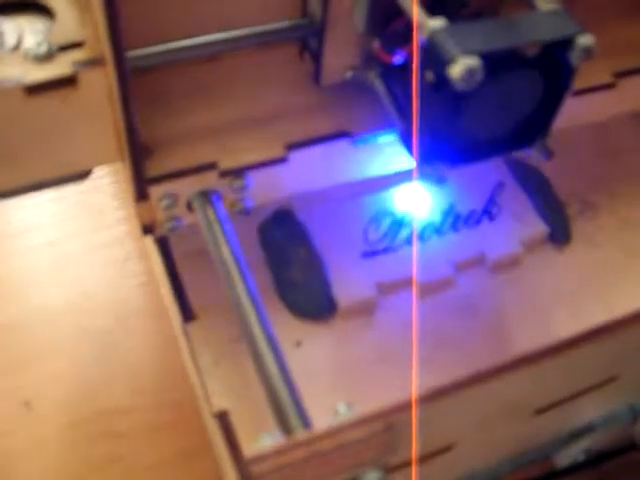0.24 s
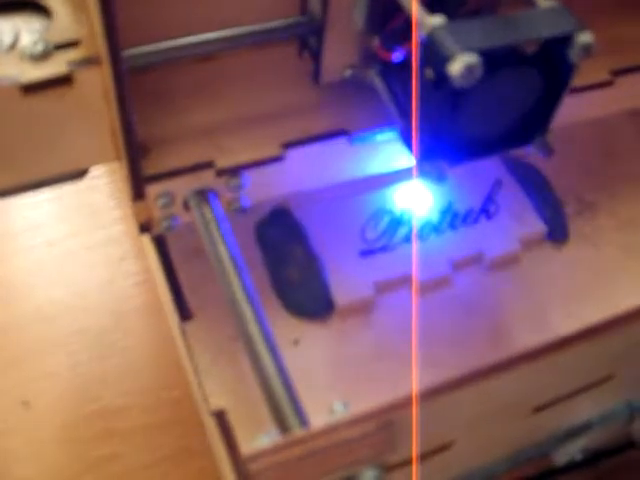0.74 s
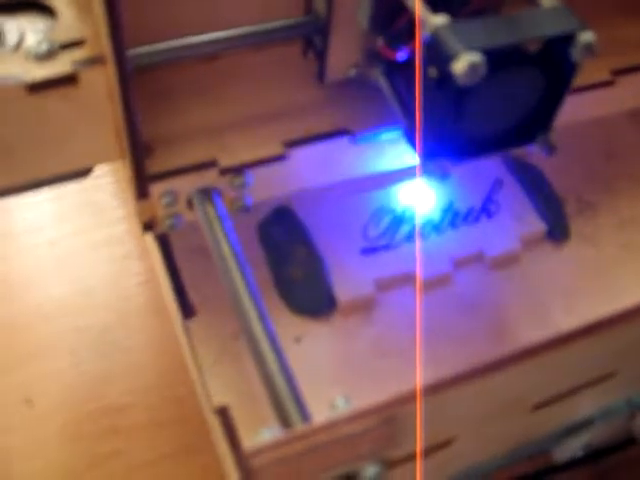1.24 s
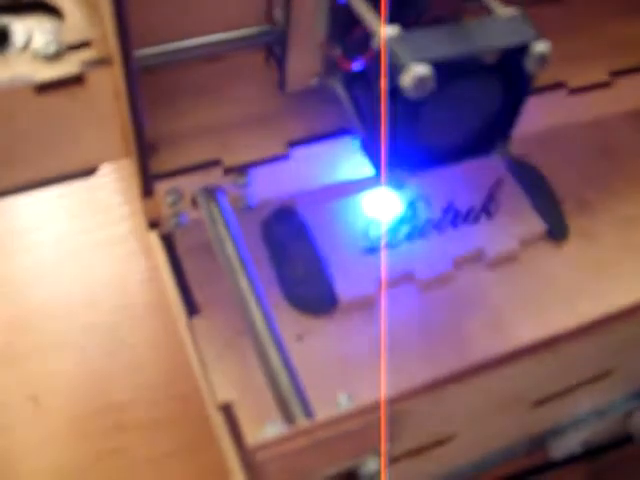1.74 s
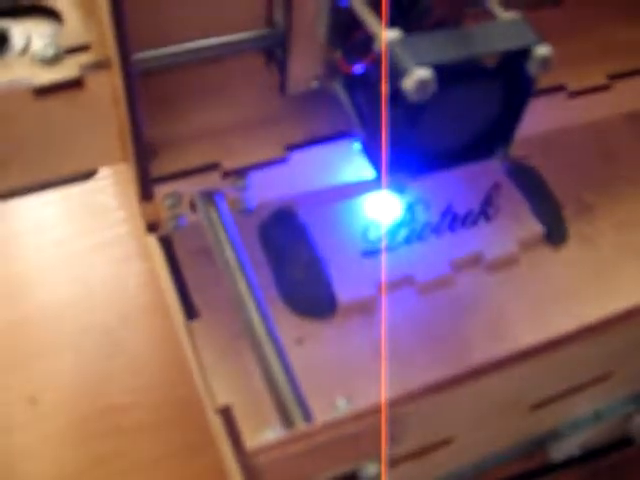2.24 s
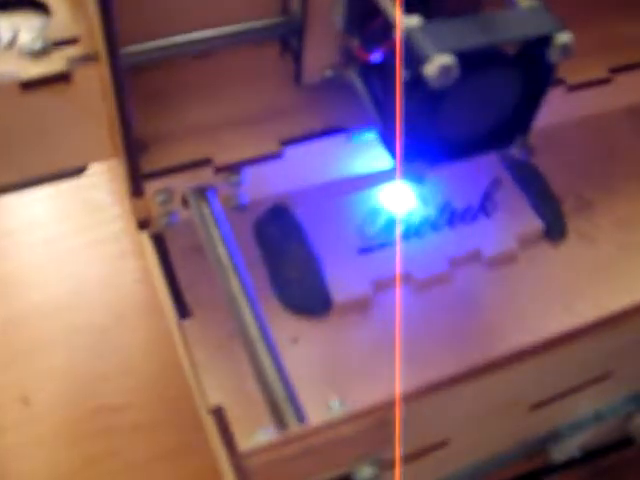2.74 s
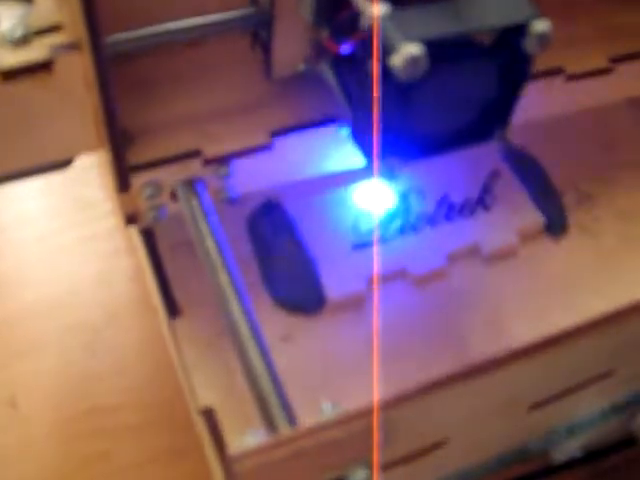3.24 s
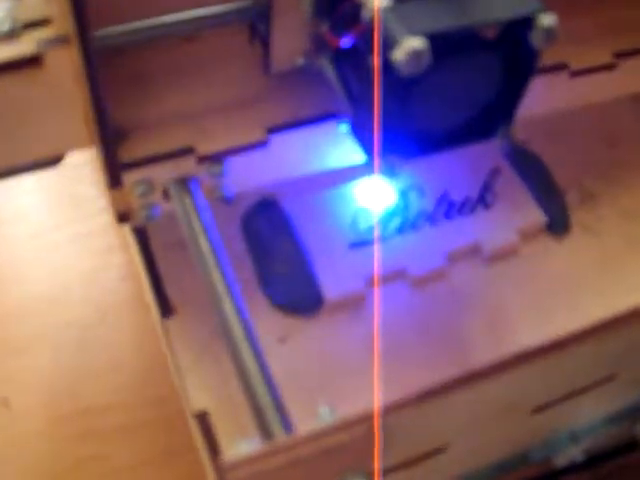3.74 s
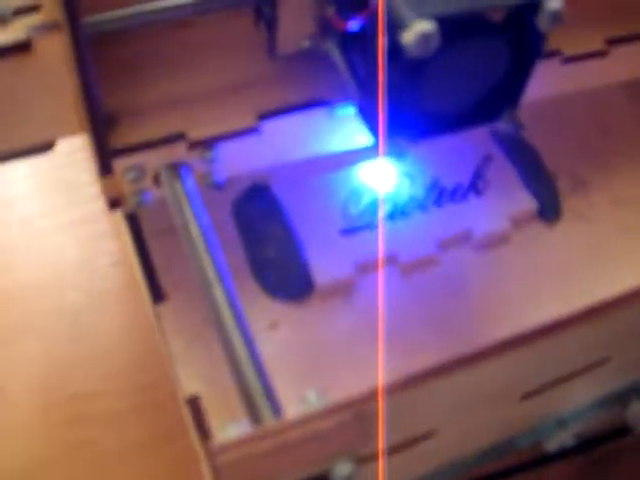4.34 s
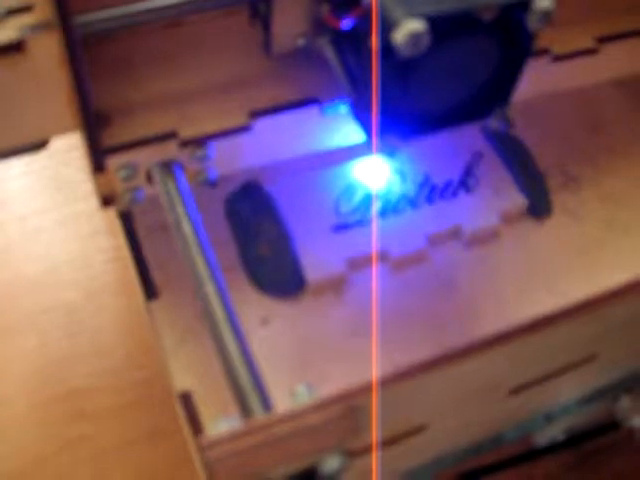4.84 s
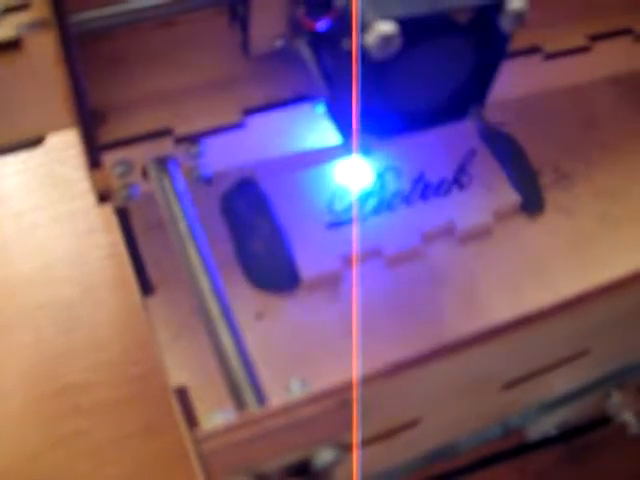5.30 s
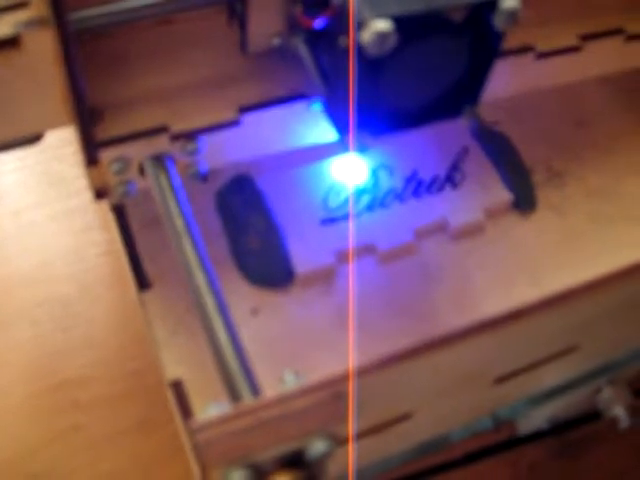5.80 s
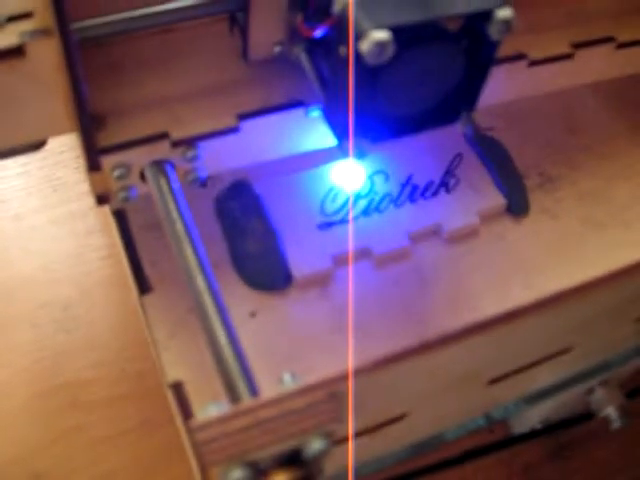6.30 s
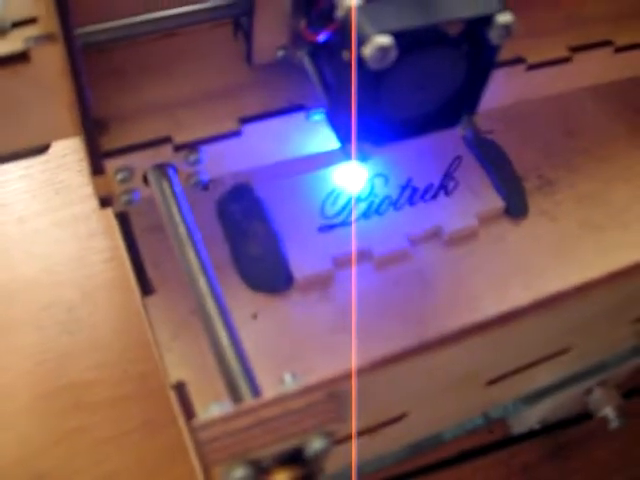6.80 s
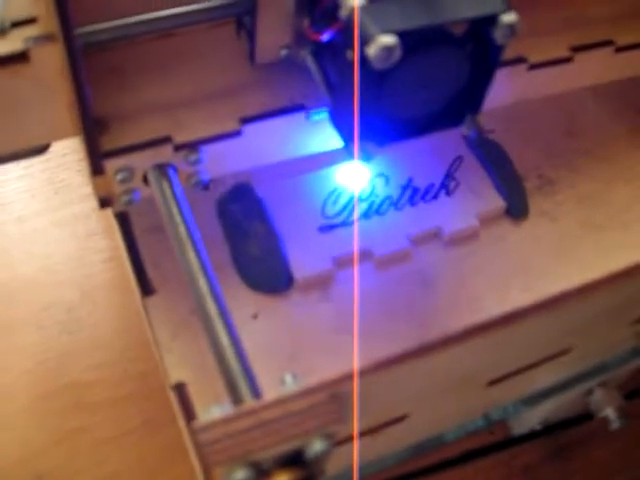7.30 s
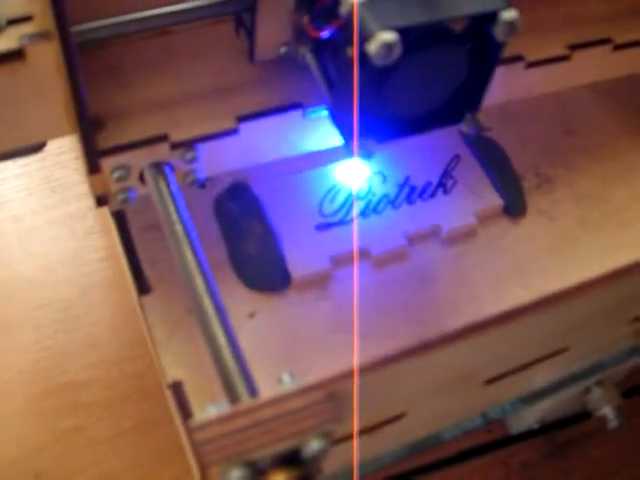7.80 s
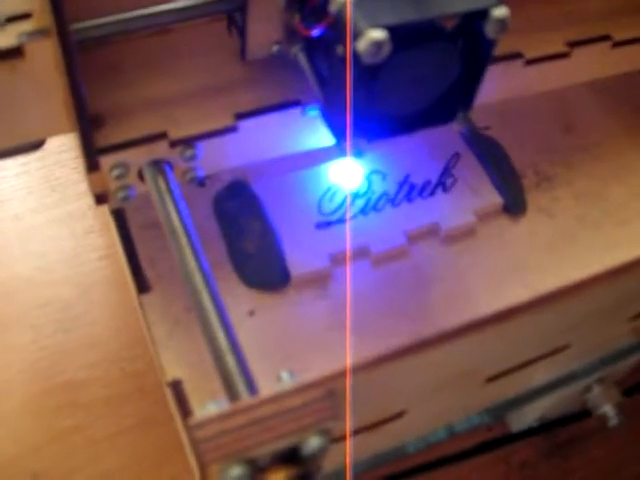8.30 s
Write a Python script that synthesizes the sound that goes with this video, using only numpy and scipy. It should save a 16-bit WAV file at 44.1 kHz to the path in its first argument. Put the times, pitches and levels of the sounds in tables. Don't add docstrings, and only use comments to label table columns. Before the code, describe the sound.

A fast mechanical throb with ticking motor steps over fan hiss, broken by sharp wooden knocks that overload the microphone and briefly duck everything.

```python
import sys
import numpy as np
from scipy import signal
from scipy.fft import rfft, irfft
from scipy.io import wavfile
from scipy.ndimage import uniform_filter1d

SR = 44100
rng = np.random.default_rng(int(sys.argv[2]) if len(sys.argv) > 2 else 0)


def master(y):
    cut = np.clip(np.atleast_2d(y).T, -1, 1)
    pcm = np.round(cut * 32767)
    wavfile.write(sys.argv[1], SR, pcm.astype(np.int16))


def decibels_to_gain(level_db):
    exponent = np.asarray(level_db, float) / 20
    return 10 ** exponent


N = 377055

# frequency [Hz], density [dB per Hz].
HISS = [(40, -25), (90, -31), (150, -8.5), (270, -7.5), (400, -1), (600, 0.5), (950, 2), (1300, -2.5),
        (1800, -6.5), (2700, -15), (3200, -25.5), (3800, -32), (5200, -36.5), (6500, -59)]
# frequency [Hz], width [Hz], level [dB].
WHISTLES = [(261, 16, -32), (578, 7, -37.5), (1275, 35, -43), (1740, 6.4, -47.5)]
# time [s], level [dB].
CLICKS = [(1.868, -46), (1.907, -57), (1.947, -55), (2.848, -47), (2.9068, -31.5), (3.318, -61.5),
          (3.396, -58.5), (3.436, -68), (3.672, -54), (3.711, -55), (4.508, -53.5), (5.55, -61),
          (5.59, -60), (5.63, -58), (5.865, -61), (6.922, -60), (8.1464, -28), (8.255, -48)]
# frequency [Hz], density [dB per Hz].
CHATTER = [(600, -16), (780, -3), (1250, 5.5), (1700, -2), (2300, -14.5), (3000, -22.5), (3800, -40.5)]
# start [s], time of a throb peak [s], time of a strong step tick [s].
STROKES = [
    (0, .0773, .06580),
    (.445, .6176, .60650),
    (1.9, 2.1854, 2.13570),
    (2.87, 2.9874, 2.94130),
    (3.4, 3.604, 3.55510),
    (4.49, 4.6231, 4.57470),
    (5.27, 5.5586, 5.54710),
    (8.2, 8.3406, 8.32350),
]
# frequency [Hz], level [dB], t60 [s],
# weak tick against strong [dB], swell [ms].
FRAME = [(309.9, 0, 0.16, -17.5, 1.3), (339, -5, .06, -13, 0.63), (383, -2, 0.081, -11, 0.83),
         (500, -1, 0.095, -2, 5.7), (566, 0.5, 0.15, -1.5, 14), (636.2, -8.5, 0.47, -1.5, 4.7),
         (690.3, -2.5, 0.097, -0.5, 2.9), (830, 0.5, 0.02, -2, 6.9), (968, -4, 0.099, -4, 2),
         (1115.4, 4, 0.059, -4, 5.7), (1200, 0, .055, -2, 3.6), (1294, 4.5, 0.05, -1.5, 4.3),
         (1448, -2.5, 0.03, -5, 3.1), (1570, -8, 0.023, -11.5, 3.3), (1943, -12.5, 0.052, -5.5, 2.5),
         (2300, -22, 0.018, -4.5, 3.3)]
# level [dB], rings of 450-750 Hz against high ones [dB],
# rings under 450 Hz against high ones [dB].
TICKS = [(-24.5, -2, -3), (-24.5, -6, -0.5), (-27.5, -1, 4), (-26.5, -4.5, -0.5), (-25.5, 0.5, 0.5),
         (-26, -0.5, 1), (-23, 2, -2), (-26, 1.5, -3)]
# 6th [dB], 7th [dB], 8th [dB], 9th [dB].
THROB = [(-23.5, -33.5, -20.5, -19.5), (-25, -34, -19.5, -19), (-27, -29, -21, -20),
         (-27.5, -33, -21.5, -19.5), (-25, -23.5, -19.5, -19.5), (-26, -24, -20.5, -19.5),
         (-23, -25.5, -20, -20.5), (-22, -27.5, -19, -20.5)]
# multiple of the step rate, level [dB].
FAINT = [(4, -45.5), (5, -40), (8.5, -44), (9.5, -35.5), (11, -34), (12, -32.5), (13, -35.5), (14, -37),
         (15, -35.5), (16, -34.5)]
# time [s], gain duck [dB], knock brightness [dB per octave],
# motor spin-up [s], belt strain [dB].
TURNS = [
    (0, 2.5, 1, 0.035, 2.2),
    (.433, 2.5, -0.5, 0.051, -0.6),
    (1.8153, 24.5, 2.5, .1, 2.5),
    (2.846, 4, 0, 0.03, 0.5),
    (3.338, 23.5, 1.5, 0.043, 2.5),
    (4.473, 3, 0.5, 0.026, -0.1),
    (5.2467, 28, 1.3, .05, 4),
    (8.146, 21.5, -1, 0.032, 2.5),
]
# time [s], peak [dB], loudest ring [Hz].
KNOCKS = [(.004, -11.5, 587), (.433, -10, 1446), (.441, -7, 1076), (.447, -9.5, 525), (1.8155, 3, 888),
          (1.8254, -6, 1600), (1.857, -15, 1900), (1.868, -14.5, 540), (1.967, -14.5, 900),
          (2.8466, -9, 1750), (2.855, -10, 640), (2.863, -12.5, 560), (2.904, -8.5, 1060),
          (2.919, -11, 580), (3.338, 1.5, 889), (3.348, -15, 1540), (3.377, -10.5, 1200),
          (3.381, -7.5, 1700), (4.472, -7.5, 895), (4.479, -7.5, 500), (4.506, -6, 1100), (4.513, -8, 575),
          (5.218, -14, 1200), (5.2459, 1, 612), (5.258, -7, 1070), (5.286, -13.5, 990), (8.1461, -1, 914),
          (8.151, -2.5, 1095), (8.165, -5.5, 1052), (8.191, -8.5, 944)]
# frequency [Hz], density [dB per Hz].
KNOCK = [(60, -48), (170, -9.5), (310, -2.5), (960, -7.5), (1600, -6.5), (2340, -12.5), (3100, -21.5),
         (3800, -33), (5000, -36), (6500, -48.5), (9000, -78)]

STEP_HZ = 29.528
HISS_DB = -24.5
SEAM_S, FIRST_SEAM_S = 1728 / SR, .0263
SEAM_DB, SEAM_SPREAD_DB = -68, 3
CHATTER_DB, CHATTER_PEAK_S, CHATTER_WEAK_DB = -32, .007, -5
TICK_STRAIN = 0.4
STOP_S = 0.063
STRAIN_S, SLACKEN_S, BASS_BACK_S = 0.63, 0.042, 0.81
BASS_MUTE, WAVER_DB = 1.8, 0.62
KNOCK_T60, LOOSER_PER_DB = 0.035, 0.1156
BRIGHT_PER_OCTAVE = 2.2
DULLER_PER_S = 120
DUCK_LATE_S, DUCK_FALL_S, DUCK_BACK_S = 0.043, 0.053, 0.093
OVERLOAD, OFFSET = .998, -.084


def evened(x):
    return x / np.sqrt(np.mean(x ** 2) + 1e-20)


def read(points, hz):
    f, value = np.transpose(points)
    return np.interp(np.log(hz + 1), np.log(f + 1), value)


def add(mix, s, sound):
    part = mix[round(s * SR):][:len(sound)]
    part += sound[:len(part)]


def drift(hz):
    knots = rng.standard_normal(int(N / SR * hz) + 2)
    return np.interp(np.arange(N) * hz / SR, np.arange(len(knots)), knots)


def resonate(x, hz, width):
    turn = np.exp(2j * np.pi * hz * np.arange(len(x)) / SR)
    r = np.exp(-np.pi * width / SR)
    return 2 * (turn * signal.lfilter([1 - r], [1, -r], x / turn)).real


def step_turns(column):
    table, t = np.array(STROKES), np.arange(N) / SR
    stroke = np.searchsorted(table[:, 0], t, "right") - 1
    return (t - table[stroke, column]) * STEP_HZ, stroke


def step_onsets():
    turns, stroke = step_turns(column=2)
    count = np.floor(turns + .26)
    at = np.flatnonzero(np.diff(count) == 1)
    return at, stroke[at], count[at + 1] % 2


def strain():
    stroke = step_turns(column=1)[1]
    since = np.arange(N) / SR - np.array(STROKES)[stroke, 0]
    return np.array(TURNS)[stroke, 4] / (1 + np.exp((since - STRAIN_S) / SLACKEN_S))


def fan():
    frames, hz = N // 256 + 5, np.fft.rfftfreq(1024, 1 / SR)
    a, b, patches = rng.standard_normal((frames, 513, 3)).T
    patches = evened(uniform_filter1d(uniform_filter1d(patches, 10, 0), 12, 1))
    spectra = (a + 1j * b) * decibels_to_gain(read(HISS, hz)[:, None] + 1.1 * patches)
    hiss = signal.istft(spectra, nperseg=1024, noverlap=768)[1][:N]
    turns = step_turns(column=2)[0]
    rattle = decibels_to_gain(0.82 * np.cos(2 * np.pi * (turns - .05)) + 0.37 * np.cos(np.pi * turns))
    whistles = sum(decibels_to_gain(db) * evened(resonate(hiss, f, w)) for f, w, db in WHISTLES)
    return decibels_to_gain(HISS_DB) * evened(hiss * rattle) + whistles


def clicks():
    out = np.zeros(N)
    seams = np.arange(FIRST_SEAM_S, N / SR, SEAM_S)
    faint = zip(seams, SEAM_DB + SEAM_SPREAD_DB * rng.standard_normal(len(seams)))
    n = np.arange(-12, 13)
    pulse = np.exp(-(n / 2.8) ** 2) * n
    for s, db in list(CLICKS) + list(faint):
        add(out, s, decibels_to_gain(db) * pulse)
    return out


def chatter():
    at, stroke, weak = step_onsets()
    kind = (2 * (stroke % 3) + weak).astype(int)
    t, hz = np.arange(2048) / SR, np.fft.rfftfreq(2048, 1 / SR)
    shape = (t / CHATTER_PEAK_S) ** 2 * np.exp(-2 * t / CHATTER_PEAK_S)
    rattles = irfft(rfft(rng.standard_normal((6, 2048))) * decibels_to_gain(read(CHATTER, hz))) * shape
    size = decibels_to_gain(1.0 * rng.standard_normal(len(at)))
    out = np.zeros(N)
    for k, rattle in enumerate(rattles):
        train = np.zeros(N)
        train[at[kind == k]] = size[kind == k] * decibels_to_gain(CHATTER_WEAK_DB * (k % 2))
        out += signal.oaconvolve(train, evened(rattle))[:N]
    return decibels_to_gain(CHATTER_DB) * evened(out)


def ticks():
    at, stroke, weak = step_onsets()
    table = np.array(TICKS)
    share = rng.standard_normal((len(STROKES), len(FRAME)))
    wobble = rng.standard_normal((len(at), len(FRAME)))
    t, out = np.arange(6000) / SR, np.zeros(N)
    for j, (hz, db, t60, weak_db, swell_ms) in enumerate(FRAME):
        low_db = table[stroke, 1] * (450 < hz < 750) + table[stroke, 2] * (hz < 450)
        train = np.zeros(N)
        train[at] = decibels_to_gain(min(weak_db, 0) * weak + low_db + 0.53 * share[stroke, j] + 1.1 * wobble[:, j])
        swell = (1 - np.exp(-t * 1000 / swell_ms)) ** 2
        ring = decibels_to_gain(db - 60 * t / t60) * np.sin(2 * np.pi * hz * t) * swell
        out += signal.oaconvolve(train, ring)[:N]
    level_db = table[step_turns(column=2)[1], 0] + TICK_STRAIN * strain()
    return decibels_to_gain(uniform_filter1d(level_db, size=400)) * evened(out)


def throb():
    turns, stroke = step_turns(column=1)
    t = np.arange(N) / SR
    since = t - np.array(STROKES)[stroke, 0] + (stroke == 0)
    turn_s, _, _, spin_s, strain_db = np.transpose(TURNS)
    past_turn = np.maximum(t - np.append(turn_s[1:], N)[stroke], 0)
    spun_up = 1 - np.exp(-since / np.maximum(spin_s, .005)[stroke])
    running = spun_up * np.exp(-past_turn / STOP_S)

    levels = np.array(THROB)[stroke].T + WAVER_DB * np.array([drift(hz=8) for _ in THROB[0]])
    levels[0] -= BASS_MUTE * strain_db[stroke] * np.exp(-since / BASS_BACK_S)
    levels[3] += strain()
    late = [0, np.pi / 2, 0, 0]
    loud = sum(decibels_to_gain(db) * np.cos(2 * np.pi * (j + 6) * turns + late[j]) for j, db in enumerate(levels))

    lag = rng.random((len(STROKES), len(FAINT)))
    faint = np.zeros(N)
    for j, (k, db) in enumerate(FAINT):
        cycles = k * turns + lag[0, j] + 0.074 * lag[stroke, j]
        faint += decibels_to_gain(db + 0.58 * drift(hz=6)) * np.cos(2 * np.pi * cycles)
    return np.sqrt(2) * (loud + faint) * running


def knock(db, ring_hz, t60, bright, noise):
    t, hz = np.arange(len(noise)) / SR, np.fft.rfftfreq(len(noise), 1 / SR)
    ring_db = 7.6 / (1 + ((hz - ring_hz) / 150) ** 2)
    colour = read(KNOCK, hz) + bright * np.log2(hz / 1000 + 1.2) + ring_db
    wood = irfft(rfft(noise) * decibels_to_gain(colour), len(noise))
    low = signal.lfilter([.12], [1, -.88], wood)
    dying = np.maximum(t - .003, 0) / t60
    burst = low * decibels_to_gain(-60 * dying) + (wood - low) * decibels_to_gain(-95 * dying)
    tail = decibels_to_gain(-11.5) * low * decibels_to_gain(-60 * t / 0.57)
    rise = 1 - np.exp(-t / 0.0011)
    return decibels_to_gain(db - 3.5) * (burst + tail) * rise / np.std(wood)


def knocks():
    out = np.zeros(N)
    noise = rng.standard_normal((len(KNOCKS), 16384))
    for (s, db, hz), row in zip(KNOCKS, noise):
        turn = [r for r in TURNS if r[0] < s + .03][-1]
        bright = turn[2] + BRIGHT_PER_OCTAVE * np.log2(hz / 1000)
        bright -= DULLER_PER_S * min(abs(s - turn[0]), .06)
        add(out, s, knock(db, hz, KNOCK_T60 * np.exp(-LOOSER_PER_DB * db), bright, row))
    return out


def scene():
    return (fan() + chatter() + ticks() + throb() + knocks())[None]


def ducking():
    duck_db, since = np.zeros(N), np.arange(SR) / SR
    for s, db, *_ in TURNS:
        dip = (1 - np.exp(-since / DUCK_FALL_S)) ** 2 * np.exp(-since / DUCK_BACK_S)
        add(duck_db, s + DUCK_LATE_S, max(db, 0) * dip)
    return duck_db


def without_faint_treble(x):
    padded = np.pad(x, (0, 3072), "reflect")
    hz, _, z = signal.stft(padded, SR, "cosine", nperseg=3072, boundary="even")
    bands = rng.standard_normal((65, z.shape[1])).repeat(24, axis=0)[:len(hz)]
    jumps = uniform_filter1d(bands + 0.52 * bands[0], size=2, axis=1)
    spared_db = 40 / (1 + (hz / 3150) ** 16)
    top_db = decibels_to_gain(30) * (hz > 6500)
    threshold = decibels_to_gain(-77.0 + 5.2 * np.clip(jumps, -2, 2) + top_db[:, None] - spared_db[:, None])
    band_power = np.add.reduceat(abs(z) ** 2, np.arange(0, len(hz), 24)) / 24
    band_level = np.sqrt(band_power).repeat(24, axis=0)[:len(hz)]
    passed = (band_level > threshold * decibels_to_gain(-4.5)) & (abs(z) > threshold * decibels_to_gain(-1.5))
    return signal.istft(z * passed, SR, "cosine", nperseg=3072)[1][None, :N]


def band_limit(x):
    return signal.sosfilt(signal.butter(12, 15400, fs=SR, output="sos"), x)


def record(dry):
    overloaded = np.clip(dry[0] / decibels_to_gain(ducking()) + OFFSET, -OVERLOAD, OVERLOAD)
    kept = without_faint_treble(overloaded)
    floor = signal.lfilter(signal.firwin(101, 7500, fs=SR), 1, rng.standard_normal(N))
    mix = np.clip(kept + clicks() + decibels_to_gain(-89) * floor, -1, 1)
    return band_limit(mix)


dry = scene()
out = record(dry)
master(out)
```